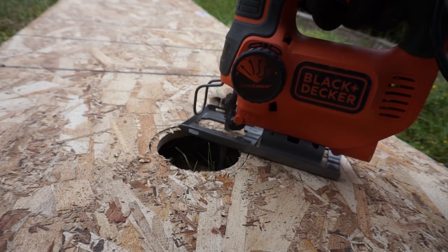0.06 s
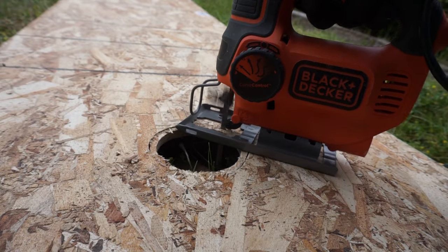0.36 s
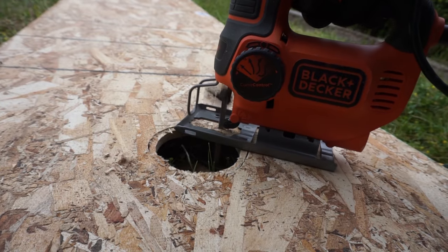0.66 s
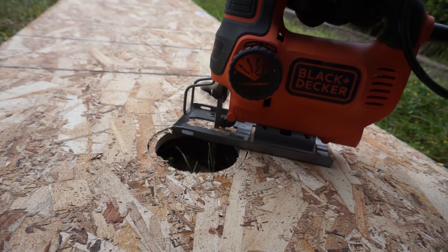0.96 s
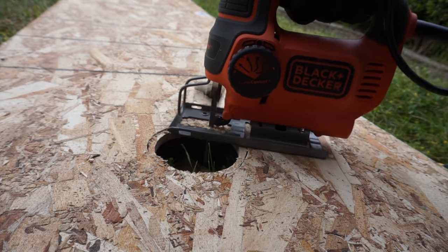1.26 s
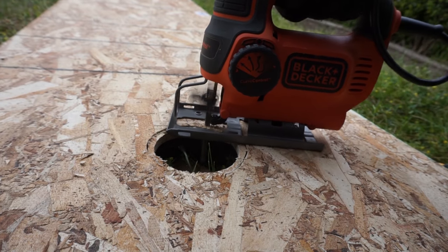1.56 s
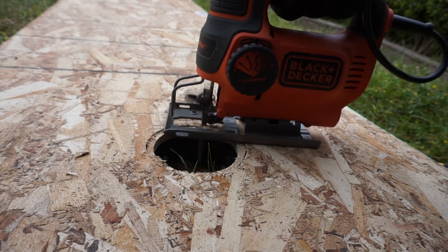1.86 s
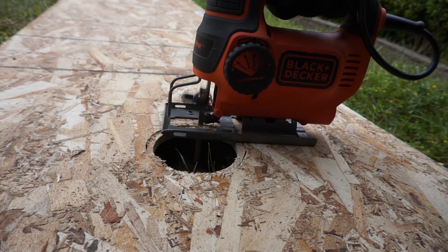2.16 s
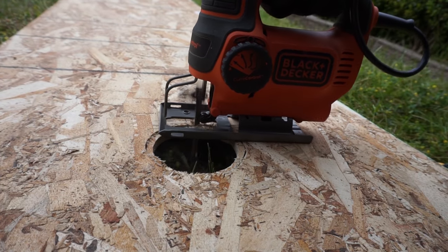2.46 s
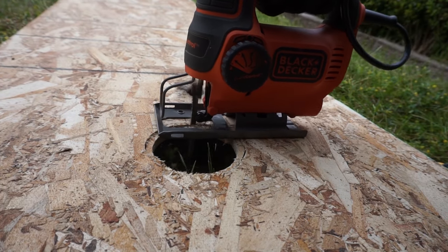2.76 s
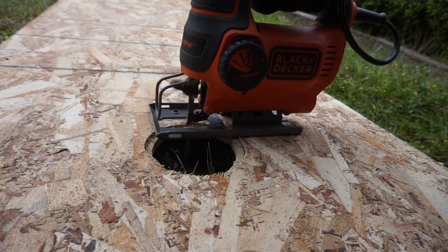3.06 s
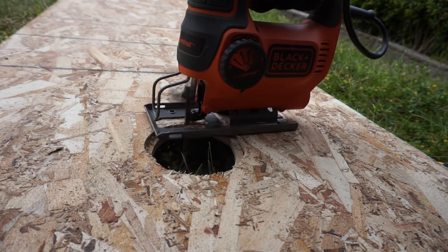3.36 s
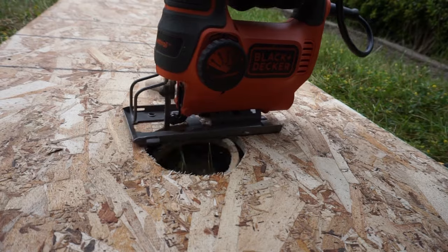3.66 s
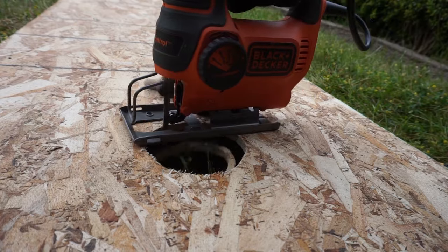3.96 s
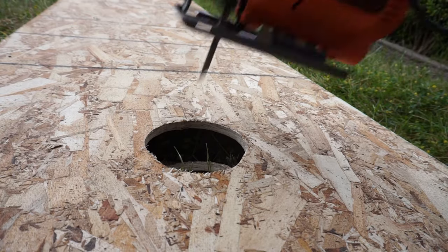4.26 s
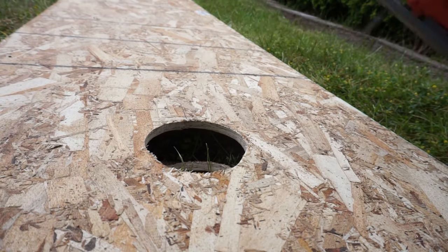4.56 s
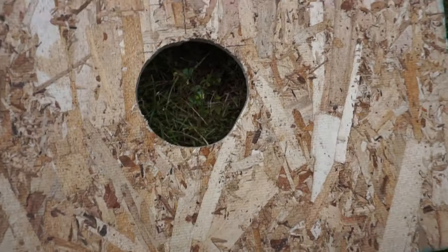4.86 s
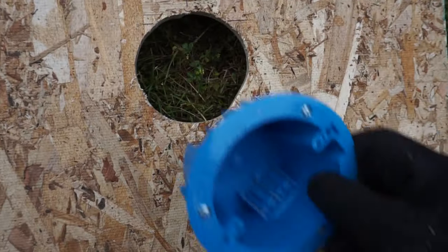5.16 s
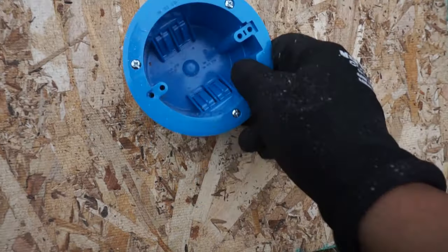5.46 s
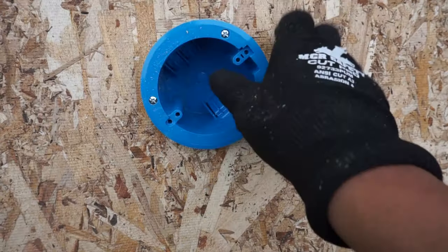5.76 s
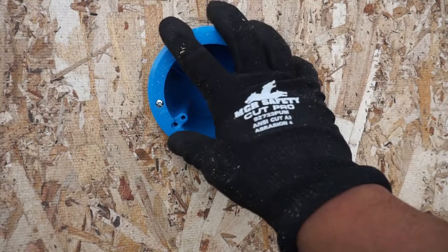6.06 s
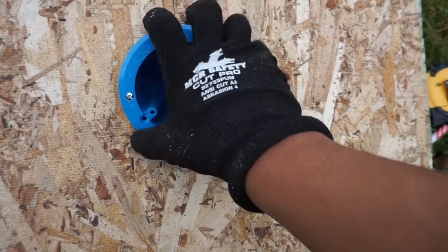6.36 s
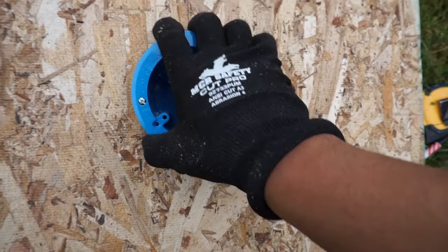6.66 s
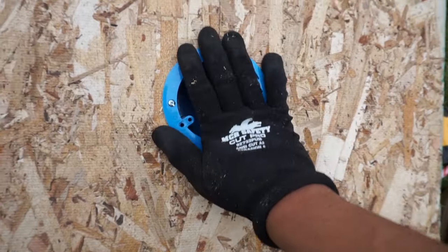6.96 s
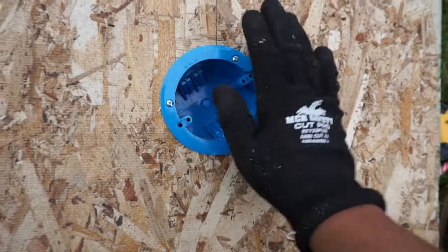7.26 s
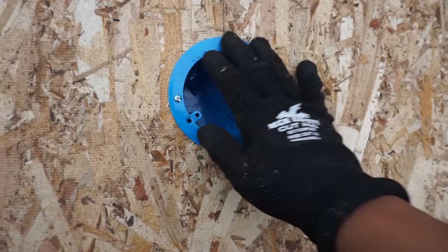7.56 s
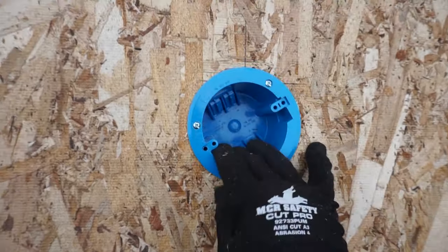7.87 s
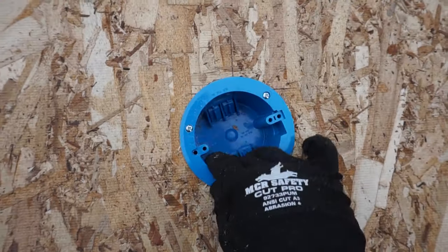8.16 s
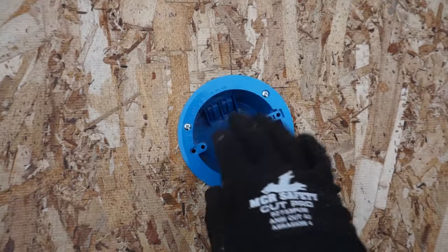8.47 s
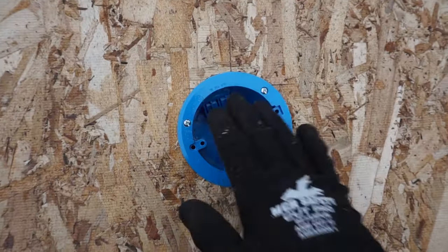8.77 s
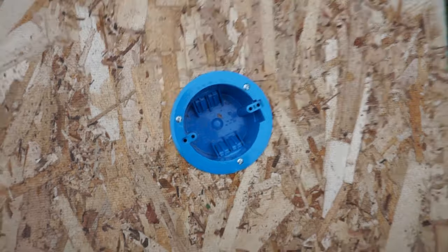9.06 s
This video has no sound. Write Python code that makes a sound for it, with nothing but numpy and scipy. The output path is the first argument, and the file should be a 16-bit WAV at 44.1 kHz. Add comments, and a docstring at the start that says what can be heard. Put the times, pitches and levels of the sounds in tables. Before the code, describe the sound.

Close to the microphone outdoors, a corded jigsaw cuts steadily through a wooden board, with a rapid rasp, a motor whine and a few thin squeaks. The blade comes free, and the motor rattles and winds down as it moves off to the right. Then a gloved hand works a plastic box into the hole, with dull knocks on the wood, sharp clicks and short scrapes over a low rumble.

```python
"""Jigsaw and plastic box, outdoors

Close to the microphone a corded jigsaw finishes a round hole in a strand board. Each stroke shakes the
board, rasps and now and then squeaks; gears and commutator whine over the fan. Lifted out, the saw coasts
away to the right until its sound breaks off. Then, near and centred, a gloved hand knocks, scrapes and
presses a plastic box into the hole, over a low rumble that swells while the hand presses on the board."""
import sys
import numpy as np
from scipy import signal
from scipy.fft import rfft, irfft, next_fast_len
from scipy.io import wavfile
from scipy.ndimage import uniform_filter1d

SR = 44100
rng = np.random.default_rng(int(sys.argv[2]) if len(sys.argv) > 2 else 0)


def generate_wav(signal):
    """Clip the signal to [-1, 1] and save it as 16-bit WAV at the path in sys.argv[1]."""
    frames = np.transpose(np.atleast_2d(signal))
    scaled = np.clip(frames, -1, 1) * 32767
    pcm = np.round(scaled).astype(np.int16)
    wavfile.write(sys.argv[1], SR, pcm)


N = 401751
T = np.arange(N) / SR
TOP_HZ = 16000

GEAR_RATIO, PINION_TEETH, COMMUTATOR_BARS = 46 / 5, 5, 24
THROUGH_S, TRIGGER_OFF_S, LIFT_S, CARRY_S, STOP_S = 3.55, 3.9, 4.003, 4.307, 4.933
DRAG_S, FRICTION_HZ_PER_S, CARRY_DB_PER_S = 1.45, 53, 22.5
# the powered motor picks up as the feed eases: time_s, turns_per_s
POWERED_SPEED = [(0, 395), (.9, 396), (1.2, 401.3), (3.05, 403.2), (3.75, 418.5)]
# load on the motor: time_s, share_of_full_load
MOTOR_LOAD = [(0, 1), (3.2, 0.9), (3.7, 0.35), (4.15, 0.11), (5, 0.13)]
# the saw at close range, before it is carried off: time_s, level_db
SAW_LEVEL = [(0.11, -17), (0.19, -20), (2.02, -17.5), (2.58, -18.5), (3.6, -16.5), (4.1, -17.5), (4.3, -18)]
# the saw drifts towards the centre, then leaves to the right: time_s, left_minus_right_db
SAW_PAN = [(0, -3), (1.6, -3), (4.1, -1), (4.7, -11)]
# one blade stroke: cycle_share, rasp_db, hiss_db, shoe_blow_db
STROKE_SHAPE = [(0, 3, 4, 3.5), (.09, -0.5, 1, -7), (.28, -2.5, 1.5, 0), (.47, -3, -5, -1),
                (.6, -1.5, 4, 0.5), (.76, -3, 2, -2.5), (1, -4.5, -3, -0.5)]
# the blade's ring within the saw's sound: time_s, level_db
BLADE_RING = [(1.05, -23), (1.3, -11), (2.1, -6.5), (2.55, -10), (3.15, -13), (3.45, -7.5), (3.7, -8),
              (4.25, -8.5), (4.45, -25)]
# motor tones: speed_multiple, loaded_db, coasting_db
WHINE_LINES = [(4, -23, -24), (PINION_TEETH - 3 / GEAR_RATIO, -23, -30), (PINION_TEETH, -11.7, -13),
               (7, -33, -22), (8, -37, -25), (2 * PINION_TEETH, -19.5, -13), (COMMUTATOR_BARS, -23, -31),
               (5 * PINION_TEETH, -40, -25), (8 * PINION_TEETH, -40, -20), (2 * COMMUTATOR_BARS, -34, -21)]
# how the housing passes those tones while coasting: frequency_hz, gain_db
HOUSING_RESPONSE = [(1400, -17), (1700, -4), (1950, 2), (2400, -6), (2950, 5), (3300, -7), (4000, -10),
                    (6000, -1)]
# how hard the shoe bears on the board: time_s, level_db
SHOE_PRESSURE = [(0, 0.5), (.25, -2), (1.35, -1.5), (1.6, 1), (2.5, -0.2), (3.5, 1.3)]
# three moments on the shoe's way round the hole: time_s
THUMP_TIMES = [1, 2.18, 3.4]
# the board's answer at those moments: stroke_rate_multiple, first_db, second_db, third_db
THUMP_HARMONICS = [(2, -21, -27, -28), (4, 0.5, -1.5, -3.5), (5, -0.5, 1.5, 2.5), (6, -1, 0, 1),
                   (7, -13, 0.5, 2.5), (8, -1.5, -2.5, -10), (9, -1, -2.5, -5), (10, 2, -2, -12),
                   (11, -8, 1.5, 0.5), (12, 3, -2, 0.5), (13, -9, -12, -5)]
# the blade binds in the curve: middle_s, half_length_s, level_db, pitch_hz
BLADE_BINDS = [(.8, .95, -20.5, 14000), (1.85, .51, -15, 14200), (3.05, .21, -11.5, 11800)]
# swells in the saw's sound: middle_s, half_length_s, level_db
BLADE_SNAGS = [(1.58, .08, -31), (1.98, .06, -33), (2.87, .1, -35)]
SHOE_JUDDERS = [(1.62, 0.08, -29.5), (1.93, .14, -29.5), (2.3, .12, -32)]  # where the cut is hardest
HOUSING_BOOM = [(4.58, 0.25, -32)]  # as it swings past the microphone
# the lifted saw's reflection off the board: time_s, lag_s, echo_share
BOARD_ECHO = [(4.15, 0.00031, 0), (4.38, 0.00046, 0.22), (4.75, 0.00038, 0.26)]

# glove and box rub on the wood: start_s, length_s, level_db, swell_db, relative_ring_db
HAND_RUBS = [(4.916, .097, -39, -4, -8), (5.438, .043, -42, -4, -4), (5.556, .028, -38.5, -8, -2),
             (5.615, .045, -48.5, 12, -5), (5.728, .1, -44.5, 6, -3.5), (6.004, .085, -45, 0.5, -5.5),
             (6.098, 0.16, -51.5, 1.5, -7), (6.315, 0.12, -36.5, 5, -2.5), (6.509, 0.016, -39, 7, -4),
             (6.567, .14, -51, 10, -6), (6.653, 0.048, -39.5, 2.5, -3), (6.747, .19, -33, 3, -0.5),
             (6.93, .11, -34.5, -5.5, -5), (7.082, 0.019, -47, 13, -8), (7.142, .074, -45.5, 7.5, -8),
             (7.396, .058, -33.5, -4.5, -7.5), (7.472, .22, -50, 1.5, -10), (7.813, .16, -41, 2, -8),
             (8.002, .075, -38, 2.5, -7), (8.12, .11, -49.5, 3, -9), (8.216, .17, -42.5, -9, -10),
             (8.39, 0.18, -46, 0.5, -9), (8.803, .027, -46, 1, -9)]
# box and hand bump the board: start_s, level_db, pitch_factor, relative_rim_db
BOARD_KNOCKS = [(5.398, -4, 0.97, -19.5), (5.42, -18, 0.79, -20), (5.469, -20, 0.77, -24),
                (5.647, -6, 0.86, -31), (5.671, -19.5, 0.69, -26), (5.7, -21, 0.82, -18),
                (6.013, -26, 0.72, -38), (6.325, -19, .91, -30), (6.338, -20, 0.91, -19),
                (6.524, -17, 0.74, -15), (6.529, -15.5, 1.1, -13), (6.535, -9.5, 1.13, -15),
                (6.961, -14, 0.74, -23), (7.008, -19.5, 0.9, -31), (7.397, -12, 0.72, -32),
                (7.404, -4, 0.87, -30), (7.41, -6.5, 0.81, -31), (7.817, -11, 0.89, -26.5),
                (7.857, -24, 0.73, -22), (7.883, -12.5, 0.77, -31), (7.948, -23, 0.84, -19),
                (8.032, -19, 0.94, -31), (8.075, -19, 0.86, -17), (8.732, -13.5, 0.9, -20),
                (8.743, -4.5, 1.01, -43)]
# the box catches on the hole's edge: start_s, level_db, relative_ring_db
BOX_CLICKS = [(5.398, -30, -7), (5.563, -30, -8), (5.641, -11.5, -22), (5.659, -20, -3.5), (5.717, -5, -3),
              (5.817, -15.5, -9), (6.009, -29.5, -9), (6.2305, -16, -29), (6.31, -21, -18),
              (6.3264, -19, -15), (6.341, -18, -12), (6.434, -6.5, -24), (6.526, -16.5, -0.5),
              (6.532, -22, -14), (6.6532, -28, -4), (6.699, -11.5, -15), (6.738, -23, -30),
              (6.752, -20, -30), (6.764, -8, -24), (6.781, -12, -17), (6.817, -21, -20), (6.833, -20, -9),
              (6.8475, -6.5, -11), (6.939, -15.5, -13), (7.04, -26, -16), (7.078, -28, -30),
              (7.1046, -11.5, -22), (7.213, -13.5, -27), (7.401, -9.5, -31), (7.468, -27.5, -8),
              (7.484, -26, -25), (8.0183, -21, -30), (8.073, -17, -19), (8.089, -22, -19),
              (8.2115, -19.5, -34), (8.399, -30, -30), (8.4195, -26, -40), (8.552, -29, -11),
              (8.731, -22, -13), (8.828, -32, -30)]
SNAP_S, SNAP_DB = 6.85, -14
# soft sounds of the hand: middle_s, half_length_s, level_db
PALM_LEANS = [(6.65, 0.54, -35.5), (7.9, 0.58, -51)]
GLOVE_RUSTLES = [(7.3, .2, -50), (7.8, 0.27, -51), (8.66, 0.09, -52)]
# low rumble, swelling while the hand presses on the board: time_s, level_db
RUMBLE_LEVEL = [(4.95, -39.5), (6.25, -32), (6.7, -28), (7.3, -31.5), (9.1, -32)]

# spectra at the microphone: frequency_hz, relative_db
RASP_SPECTRUM = [(590, -37), (1000, -5), (1130, -6), (1400, -3.5), (1560, -0.5), (1750, -3), (1980, -0.5),
                 (2150, 0), (2610, 1), (3000, 0), (3650, -4), (4700, -3.5), (6200, -12), (7000, -14),
                 (9100, -44), (15400, -120)]
RATTLE_SPECTRUM = [(900, -18), (1250, -6), (1550, -3), (1900, -3), (2300, -4), (2600, -3.5), (3000, -3.5),
                   (3600, -5.5), (4600, -6), (5500, -11.5), (7000, -18)]
HISS_SPECTRUM = [(4000, -12), (5500, -1.5), (7500, -1), (11000, 2), (14000, 1.5), (16000, -5.5)]
THUD_SPECTRUM = [(30, -15), (85, -16.5), (150, -3), (300, 6.5), (480, 0), (700, -16), (1500, -48.5)]
SNAG_SPECTRUM = [(35, -8), (70, -7), (160, 0), (450, -2), (700, -6)]
HOUSING_SPECTRUM = [(200, -21), (380, -15), (480, -1.5), (700, -0.5), (900, -1), (1100, -4.5), (1300, -9),
                    (3000, -54)]
BOOM_SPECTRUM = [(480, -13), (680, -0.5), (820, 2), (980, 0), (1150, -18)]
FIBRE_SPECTRUM = [(300, 0.5), (650, -3.5), (1100, -9), (1700, -9.5), (2450, -8.5), (3600, -8), (5400, -8),
                  (7300, -8.5), (9600, -9), (13000, -7), (16000, -7.5)]
MURMUR_SPECTRUM = [(60, -3), (150, -1), (300, -3), (600, -9.5), (800, -16), (1100, -30)]
RUMBLE_SPECTRUM = [(15, -59.5), (25, -22.5), (81, -4.5), (150, -7), (262, -19.5), (300, -17.5), (433, -25),
                   (486, -29), (556, -27.5), (743, -42), (1130, -43.5), (1250, -47), (1320, -46),
                   (2500, -67), (3250, -92), (5500, -120)]
AIR_SPECTRUM = [(300, 1.5), (1000, -11.0), (4000, -18.0), (15000, -21.0)]

# resonances: pitch_hz, relative_db, t60_s
SAW_BLADE_MODES = [(2380, -7, .018), (2585, -2, .032), (2650, -1, .032), (2760, -4, .02), (2970, -3, .018),
                   (3230, -4, .016)]
SAW_SHOE_MODES = [(215, -4.5, .04), (345, -1.5, .035), (520, -0.5, .03), (657, -1, .025), (900, -1.5, .018)]
BOX_SCRAPE_MODES = [(1098, -12, .03), (1406, -14, .025), (2250, -2, .012), (2510, 0.5, .015),
                    (2760, 1.5, .015), (3070, -3, .012), (3860, -1, .016), (4970, -3.5, .01),
                    (6400, -0.5, .008)]
BOARD_KNOCK_MODES = [(131, -4, 0.08), (242, -6.5, 0.15), (289, 1, 0.074), (325, 12, 0.041), (398, 4, 0.05),
                     (488, -5, 0.05)]
FREE_PANEL_MODES = [(488.6, 2.5, .15), (635, -2, .11), (760, -2.5, .14), (1065, -12, .18), (1350, -16, .14)]  # the same pitches wherever the board is struck
BOX_RIM_MODES = [(725, 4, .04), (1080, 3, 0.09), (1317, -1, 0.1), (1570, -4, .09), (1830, -4, .09),
                 (2360, -3, 0.064), (2790, -3.5, 0.09)]  # lower, with the rim lying on the wood
BOX_CLICK_MODES = [(1324, -12, .11), (1410, 1.5, 0.067), (1880, -10, 0.094), (2425, 2, 0.073),
                   (2541, 8, 0.046), (2627, 5, 0.052), (2865, 5.5, 0.041), (3360, -11, .03),
                   (4650, -8, .033), (7680, 4.5, .023)]
BOX_WEDGED_MODES = [(1055, -7, 0.22), (1094, -14, .09), (1190, -13, 0.13), (2960, -7, .06), (3682, -6, .06),
                    (3900, 1, .045), (4290, -8, .035), (5400, -8, .03)]  # held tight in the hole


def undb(db):
    """Decibels to gain."""
    return 10 ** (np.asarray(db) / 20)


def unit(x):
    """Scale to rms 1."""
    return x / np.sqrt(np.mean(x ** 2))


def curves(rows, at=T):
    """The columns of a table, joined by straight lines along the first."""
    axis, *columns = np.transpose(rows)
    return [np.interp(at, axis, column) for column in columns]


def ramp(start_s, length_s):
    """A straight rise from 0 to 1."""
    return np.clip((T - start_s) / length_s, 0, 1)


def swells(rows, at=T):
    """The gain of bell-shaped swells: middle_s, half_length_s, level_db."""
    return sum(undb(db) * np.exp(-((at - s) / half) ** 2) for s, half, db, *_ in rows)


def fade(t60, size=SR // 2):
    """A decay of 60 dB in t60 seconds."""
    return undb(-60 * T[:size] / t60)


def walk(rate_hz):
    """A random wander with spread near 1."""
    knots = rng.standard_normal(8192)
    return 1.2 * np.interp(T * rate_hz, np.arange(len(knots)), knots)


def noise(side_db, size=N):
    """Stereo noise; side_db sets its width."""
    mid, side = rng.standard_normal((2, size))
    return unit(mid + undb(side_db) * side * np.array([[1], [-1]]))


def grit(side_db, spread_db, size=24):
    """Noise broken into tiny grains of uneven strength."""
    grains = np.repeat(undb(spread_db * rng.standard_normal(N // size + 1)), size)[:N]
    return unit(noise(side_db) * grains)


def snaps(per_s, spread_db):
    """Sparse impulses of very uneven strength; rms 1."""
    hits = rng.random(N) < per_s / SR
    return unit(hits * undb(spread_db * np.minimum(rng.exponential(size=N), 3)))


def burst(lo_hz, hi_hz, t60, side_db, size=SR // 2):
    """A dying burst of band noise, starting at rms 1."""
    band = signal.butter(2, [lo_hz, min(hi_hz, .45 * SR)], "band", fs=SR, output="sos")
    return unit(signal.sosfilt(band, noise(side_db, size))) * fade(t60, size)


def colour(x, spectrum):
    """Filter by a spectrum table, falling 30 dB an octave beyond its ends; rms 1."""
    hz, db = np.transpose(spectrum)
    size = next_fast_len(N)
    octave = np.log2(np.maximum(np.fft.rfftfreq(size, 1 / SR), 1))
    outside = np.maximum(np.log2(hz[0]) - octave, 0) + np.maximum(octave - np.log2(hz[-1]), 0)
    gain = undb(np.interp(octave, np.log2(hz), db) - 30 * outside)
    return unit(irfft(rfft(x, size) * gain, size)[..., :N])


def flicker(x, rate_hz, depth_db, count=12):
    """The point of contact keeps changing, so each band swells and fades by itself."""
    size = next_fast_len(N)
    spectrum, hz = rfft(x, size), np.fft.rfftfreq(size, 1 / SR)
    centres = np.geomspace(1000, TOP_HZ, count)
    bands = (irfft(spectrum * np.interp(hz, centres, pick), size)[:, :N] for pick in np.eye(count))
    return sum(band * undb(depth_db * walk(rate_hz)) for band in bands)


def ring(modes, pitch=1, size=SR // 2, place_db=3.5):
    """Struck modes, each as strong as the place of the blow makes it; rms 1 over the first 5 ms."""
    offsets_db = place_db * rng.standard_normal(len(modes))
    tone = sum(undb(db + offset) * fade(t60, size) * np.sin(2 * np.pi * hz * pitch * T[:size])
               for (hz, db, t60), offset in zip(modes, offsets_db))
    return tone / np.sqrt(np.mean(tone[:SR // 200] ** 2))


def resonate(force, modes, pitch=1, size=SR // 8):
    """Drive an object's modes with a force; their response has unit energy."""
    response = sum((-1) ** k * undb(db) * fade(t60, size) * np.sin(2 * np.pi * hz * pitch * T[:size])
                   for k, (hz, db, t60) in enumerate(modes))
    response /= np.linalg.norm(response)
    return signal.oaconvolve(np.atleast_2d(force), response[None], axes=1)[:, :N]


def add(out, start_s, sound):
    """Mix a sound in at a time."""
    i = max(int(start_s * SR), 0)
    out[:, i:i + sound.shape[-1]] += sound[..., :max(N - i, 0)]


def motor_speed():
    """Turns per second: nearly steady under power, then slowed by air drag and brush friction."""
    coast_s = np.clip(T, TRIGGER_OFF_S, STOP_S) - TRIGGER_OFF_S
    kept = np.exp(-coast_s / DRAG_S)
    hz = curves(POWERED_SPEED)[0] * kept - FRICTION_HZ_PER_S * DRAG_S * (1 - kept)
    wander = .0013 * walk(30) + .005 * ramp(TRIGGER_OFF_S, .495) * walk(70)  # slack gears run unevenly
    return hz * (1 + wander)


def uneven(strokes, spread_db):
    """A fresh level in dB for each up and down stroke."""
    return spread_db * np.interp(2 * strokes, np.arange(1024), rng.standard_normal(1024))


def reversals(strokes, late_cycles, spread_db):
    """A loosely timed blow of uneven strength at each turn of the blade; rms 1."""
    count = int(2 * strokes[-1])
    slack, strength = rng.standard_normal((1024, 2))[:count].T
    at = np.searchsorted(strokes, np.arange(count) / 2 + late_cycles + .0399 * slack)
    return unit(np.bincount(at, undb(spread_db * np.minimum(strength, 1.5)), N + 1)[:N])


def tooth_rasp(level_db):
    """The teeth tear through the strands in gritty pulses."""
    teeth = grit(side_db=-8, spread_db=1.3) * undb(level_db)
    return colour(flicker(teeth, rate_hz=45, depth_db=.74), RASP_SPECTRUM)


def blade_ring(strokes, rasp_db):
    """The blade rings as its teeth catch and as it turns round."""
    pinch = undb(rasp_db + uneven(strokes, spread_db=3))
    catches = unit(grit(side_db=-6, spread_db=1.2) * pinch)
    blows = undb(-2.5) * reversals(strokes, late_cycles=.0501, spread_db=4)
    force = (catches + blows) * undb(2 * walk(16))
    return undb(curves(BLADE_RING)[0]) * unit(resonate(force, SAW_BLADE_MODES))


def stroke_hiss(level_db, slap, load):
    """A high hiss pulses with the cut under load and with the plunger when running free."""
    pulses = load * unit(undb(level_db)) + (1 - load) * unit(slap ** 1.5)
    grains = grit(side_db=-3.5, spread_db=1.1) * pulses
    return colour(flicker(grains, rate_hz=60, depth_db=1.5), HISS_SPECTRUM)


def whine(motor_hz, turns, speed, load):
    """Rotor, gear and commutator tones; coasting, they swell as they fall through housing resonances."""
    coasting = ramp(TRIGGER_OFF_S - .08, .11) * speed
    channel_phase = np.array([[0], [.6]])
    out = 0
    for k, loaded_db, coasting_db in WHINE_LINES:
        housing_db = curves(HOUSING_RESPONSE, k * motor_hz)[0]
        loaded = undb(loaded_db) * load ** .78  # the teeth mesh harder under load
        free = undb(coasting_db + housing_db) * coasting
        chatter = undb(1.3 * walk(30.03) + 4.5 * coasting * (walk(220) - .5))  # slack teeth
        tone = np.sqrt(2) * np.sin(2 * np.pi * k * turns + channel_phase) * (k * motor_hz < TOP_HZ)
        out = out + (loaded + free) * chatter * tone
    return out


def board_shake(strokes, blow_db, load, speed):
    """The shoe hammers the board once a stroke. Returns the board's sound and the gain of the blows."""
    pressure_db = curves(SHOE_PRESSURE)[0]
    # three times the stroke rate meets the bending mode, until the blade breaks through
    flex_db = -30 + 1.6 * pressure_db - 13 * ramp(THROUGH_S, .082)
    flex = np.sqrt(2) * np.sin(2 * np.pi * 3 * strokes) * undb(flex_db + .84 * walk(19))
    thumps = 0
    for k, *levels_db in THUMP_HARMONICS:  # nearly in step, so each stroke is one thump
        gain = undb(np.interp(T, THUMP_TIMES, levels_db) + 1.54 * walk(12))
        cycles = k * strokes + .16 * rng.standard_normal() + .024 * walk(15)
        thumps = thumps + gain * np.cos(2 * np.pi * cycles)
    bite = undb(uneven(strokes, spread_db=1.8) + walk(9))
    thumps = undb(1.4) * load ** .58 * unit(thumps * bite)
    # the rotor's imbalance stands out as the load falls away
    hum = np.sqrt(2) * np.sin(2 * np.pi * GEAR_RATIO * strokes) * undb(-1 - 15.5 * load)
    blows = undb(blow_db + uneven(strokes, spread_db=1.5))
    thud = colour(noise(side_db=-22.5) * blows, THUD_SPECTRUM) * undb(-3.5 - 4.2 * load)
    jolts = colour(noise(side_db=-13) * blows, SNAG_SPECTRUM) * swells(BLADE_SNAGS)
    contact = undb(-18 * ramp(LIFT_S, .26)) * speed ** 2
    return jolts + contact * (flex + undb(-25 + pressure_db) * (thumps + thud + hum)), blows


def housing_shake(blows, load, speed):
    """The blows sound the hollow housing, more freely once the saw is unloaded."""
    body = colour(noise(side_db=-16.5) * blows, HOUSING_SPECTRUM)
    return undb(-25.5 - 1.7 * load) * speed ** 2.15 * body


def squeaks(strokes):
    """On the return stroke the blade may bind in the curved kerf: a brief, rising, very high squeal."""
    out = np.zeros((2, N))
    starts = np.interp(np.arange(int(strokes[-1])) + .55, strokes, T)
    t = T[:SR // 75]
    for s, (strength, detune, octave_chance) in zip(starts, rng.standard_normal((256, 3))):
        hz = min(curves(BLADE_BINDS, s)[2] + 800 * detune, 14800) * (1 if octave_chance < 1 else .5)
        wobble = .17 * np.cumsum(rng.standard_normal((2, len(t))), axis=1)
        tone = np.sin(2 * np.pi * hz * t * (1 + 2 * t) + wobble) * np.hanning(len(t))
        add(out, s, tone * swells(BLADE_BINDS, s) * undb(3 * min(strength, 1.3)))
    return out


def shoe_judder(strokes):
    """Where the cut is hardest, each turn of the blade rings the shoe."""
    blows = reversals(strokes, late_cycles=.02, spread_db=4.5)
    return resonate(blows * swells(SHOE_JUDDERS), SAW_SHOE_MODES)


def plunger_slap(strokes, speed):
    """A gain: the plunger slaps through its play at both ends of a stroke, more sharply when slow."""
    strong = (.73 + 1.6 * (1 - speed)) * np.exp(-((strokes + .27) % 1) / .15)
    weak = .33 * np.exp(-((strokes + .68) % 1) / .12)
    slap = 1 + strong + weak
    return slap / np.sqrt(uniform_filter1d(slap ** 2, size=SR // 5))


def free_rattle(turns, slap, harmonics=51, size=1024):
    """Fan, bearings and brushes repeat a rough pattern each turn, amid grit; the plunger pulses both."""
    grains = grit(side_db=-7, spread_db=1.5)
    pattern = irfft(np.r_[0, rfft(rng.standard_normal(size))[1:harmonics + 1]], size)
    clatter = unit(np.interp(turns % 1, np.arange(size) / size, pattern) * undb(2 * walk(60)))
    return colour((grains + undb(-11) * clatter) * slap, RATTLE_SPECTRUM)


def board_reflection(direct):
    """The lifted saw also reaches the microphone off the board; the changing detour moves a notch."""
    lag_s, share = curves(BOARD_ECHO)
    echo = np.array([np.interp(T - lag_s, T, channel) for channel in direct])
    return (direct + share * echo) / np.hypot(1, share)


def jigsaw():
    """Close up, a geared motor drives the blade: rasp under load gives way to rattle as it runs free."""
    motor_hz = motor_speed()
    speed = motor_hz / motor_hz.max()
    turns = np.cumsum(motor_hz) / SR
    strokes = .05 + turns / GEAR_RATIO
    load = curves(MOTOR_LOAD)[0]
    rasp_db, hiss_db, blow_db = curves(STROKE_SHAPE, strokes % 1)
    bite_db = uneven(strokes, spread_db=1)
    slap = plunger_slap(strokes, speed)
    rasp = np.sqrt(load) * tooth_rasp(rasp_db + bite_db)
    blade = blade_ring(strokes, rasp_db)
    rattle = np.sqrt(1 - load) * free_rattle(turns, slap)
    hiss = stroke_hiss(hiss_db + bite_db, slap, load)
    machine = rasp + rattle + blade + whine(motor_hz, turns, speed, load)
    board, blows = board_shake(strokes, blow_db, load, speed)
    housing = housing_shake(blows, load, speed)
    judder = shoe_judder(strokes)
    boom = colour(noise(side_db=-18) * slap, BOOM_SPECTRUM) * swells(HOUSING_BOOM)
    level_db = curves(SAW_LEVEL)[0] - CARRY_DB_PER_S * np.maximum(T - CARRY_S, 0)
    pan_db = np.array([[.5], [-.5]]) * curves(SAW_PAN)[0]
    saw = (board_reflection(undb(level_db + .51) * machine + housing) + boom) * undb(pan_db)
    treble_db = level_db - 1 + load * (-2 + .63 * T)  # the cut brightens as the saw turns round the hole
    treble = (undb(treble_db) * hiss + squeaks(strokes)) * undb(.33 * pan_db)
    return (board + judder + saw + treble) * np.clip((STOP_S - T) / .0029, 0, 1)


def crackle(per_s, spread_db):
    """Single fibres snap in tiny ticks."""
    hiss = noise(side_db=-2)
    ticks = signal.fftconvolve(snaps(per_s, spread_db), fade(.0022, size=SR // 100))[:N]
    return unit(hiss * ticks)


def sliding(attack_s=.016, release_t60_s=.17, skid_t60_s=.06):
    """Plastic and glove drag over wood fibres; the rim sticks and slips, ringing the box's shell."""
    drag, scrape = 0, np.zeros((2, N))
    stick_slip = unit(snaps(per_s=700, spread_db=3.3) * (1 + .5 * noise(side_db=0)))
    for (s, length, db, swell_db, ring_db), grip in zip(HAND_RUBS, rng.standard_normal(len(HAND_RUBS))):
        release_db = -60 * np.clip((T - s - length) / release_t60_s, 0, 2)
        push = ramp(s, attack_s) * undb(db + swell_db * ramp(s, length) + release_db)
        span = slice(int(s * SR), int((s + length + release_t60_s) * SR))
        shell = resonate(stick_slip[:, span] * push[span], BOX_SCRAPE_MODES, pitch=1 + .035 * grip)
        add(scrape, s, undb(ring_db) * shell)
        drag = drag + push
    skid = sum(ramp(s - .008, .012) * undb(db - 27 - 60 * np.maximum(T - s, 0) / skid_t60_s)
               for s, db, *_ in BOARD_KNOCKS)  # every knock skids a little
    slips = grit(side_db=-6, spread_db=2) * undb(1.5 * walk(120))
    slips += undb(-4.5) * crackle(per_s=260, spread_db=3.5)
    fibres = colour(flicker(slips, rate_hz=70, depth_db=1.8), FIBRE_SPECTRUM)
    return scrape + fibres * np.sqrt(drag ** 2 + skid ** 2 + swells(GLOVE_RUSTLES) ** 2)


def low_rumble(drone_hz=76.9):
    """A throbbing rumble with a low drone in it, and faint wide air; they set in abruptly as the scene changes,
    just as the saw's sound breaks off."""
    rumble = colour(noise(side_db=-35) * undb(1.8 * walk(20)), RUMBLE_SPECTRUM)
    drone = np.sin(2 * np.pi * (drone_hz * T + .12 * walk(5))) * undb(-6 + 2 * walk(6))
    air = colour(noise(side_db=4.5), AIR_SPECTRUM) * undb(-49.5)
    return ((rumble + drone) * undb(curves(RUMBLE_LEVEL)[0]) + air) * ramp(STOP_S, .018)


def knocks():
    """Blows on the board: low modes, a dense woody tail and the ring of the panel and the box's rim."""
    out = np.zeros((2, N))
    # a cushioned contact rounds the attack; the open board radiates no deep bass
    contact = signal.butter(2, [150, 620], "band", fs=SR, output="sos")
    for s, db, pitch, rim_db in BOARD_KNOCKS:
        wood = signal.sosfilt(contact, ring(BOARD_KNOCK_MODES, pitch))
        tail = undb(-16.5) * burst(lo_hz=196, hi_hz=434, t60=.22, side_db=-17)
        rim = ring(BOX_RIM_MODES) + undb(.5) * burst(lo_hz=500, hi_hz=2790, t60=.046, side_db=-2)
        panel = undb(-21) * ring(FREE_PANEL_MODES)
        add(out, s, undb(db) * (wood + tail + panel + undb(rim_db) * rim))
    return out


def clicks():
    """The plastic catches and lets go: a tick, a crack and the shell's ring, retuned by the grip."""
    out = np.zeros((2, N))
    release = 1 - np.exp(-T[:SR // 2] / .0013)  # the catch takes a moment to tear free
    for (s, db, ring_db), grip in zip(BOX_CLICKS, rng.standard_normal(len(BOX_CLICKS))):
        tick = undb(-8) * burst(lo_hz=6940, hi_hz=17100, t60=.0022, side_db=-7)
        crack = undb(-4.5) * burst(lo_hz=2520, hi_hz=15000, t60=.022, side_db=-4.5)
        tail = undb(-26) * burst(lo_hz=1500, hi_hz=9000, t60=.065, side_db=-6)
        modes = ring(BOX_CLICK_MODES, pitch=1 + .012 * grip, place_db=2)
        shell = modes + undb(-5) * burst(lo_hz=1200, hi_hz=3280, t60=.052, side_db=-4)
        add(out, s, undb(db) * (tick + release * (crack + tail + undb(ring_db) * shell)))
    add(out, SNAP_S, undb(SNAP_DB) * ring(BOX_WEDGED_MODES, place_db=1))  # the box snaps past the edge
    return out


def palm_murmur():
    """The palm leans on the box and the board murmurs under it."""
    return colour(noise(side_db=-18) * undb(2 * walk(30)), MURMUR_SPECTRUM) * swells(PALM_LEANS)


def scene():
    """Near the microphone the cut, then the box going in over a low rumble."""
    return jigsaw() + knocks() + clicks() + sliding() + palm_murmur() + low_rumble()


def record(dry):
    """The microphone chain clips peaks at full scale and cuts the treble above TOP_HZ."""
    lowpass = signal.ellip(10, .2, 70, TOP_HZ, fs=SR, output="sos")
    return signal.sosfilt(lowpass, np.clip(dry, -1, 1))


dry = scene()
out = record(dry)
generate_wav(out)
```